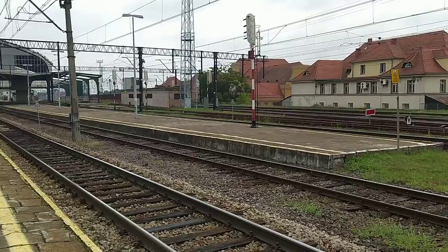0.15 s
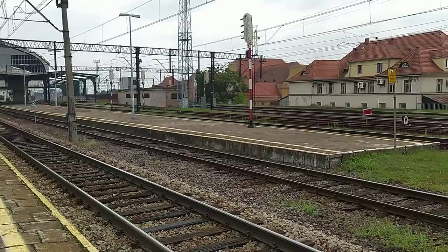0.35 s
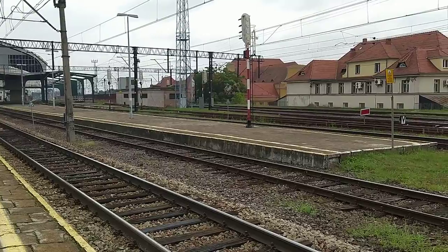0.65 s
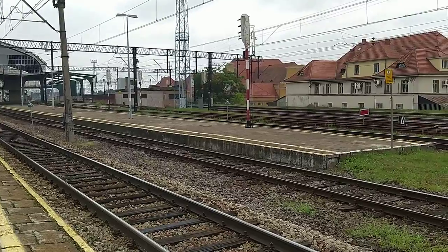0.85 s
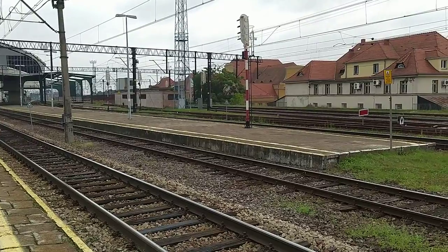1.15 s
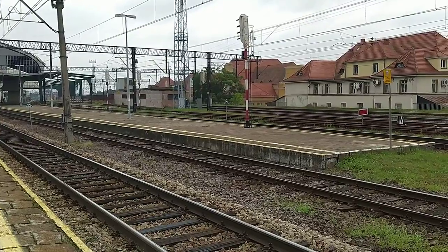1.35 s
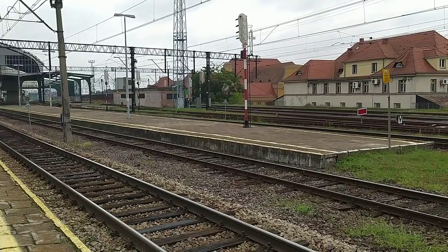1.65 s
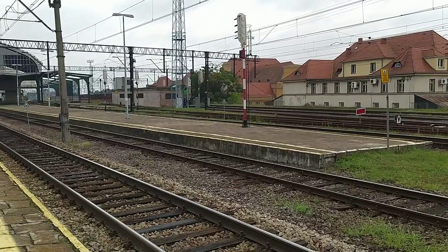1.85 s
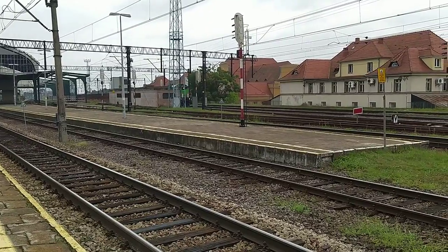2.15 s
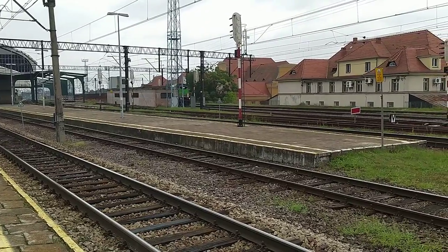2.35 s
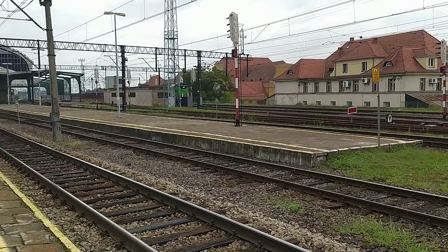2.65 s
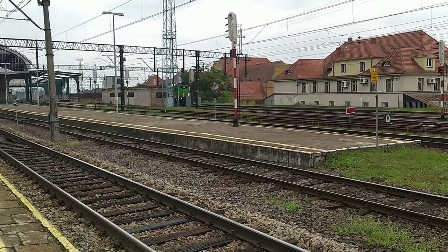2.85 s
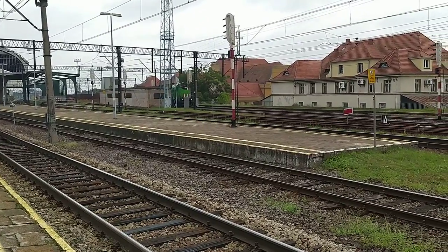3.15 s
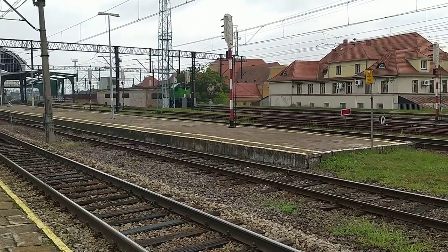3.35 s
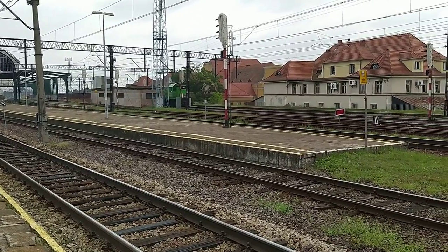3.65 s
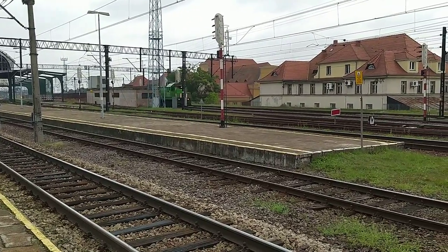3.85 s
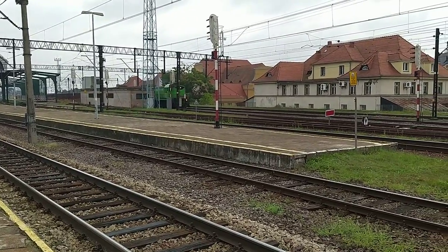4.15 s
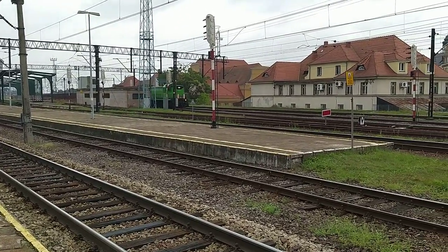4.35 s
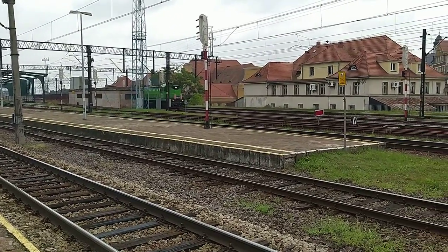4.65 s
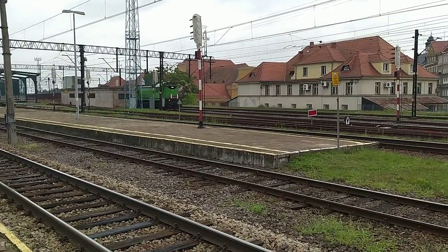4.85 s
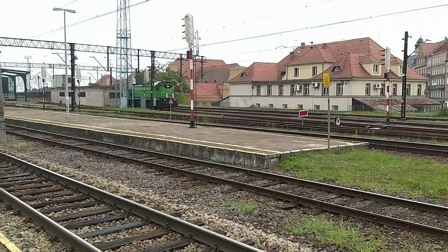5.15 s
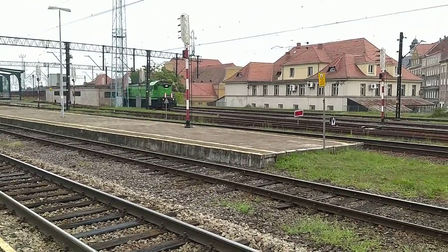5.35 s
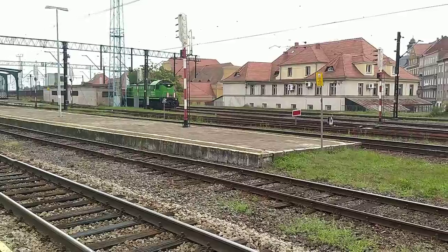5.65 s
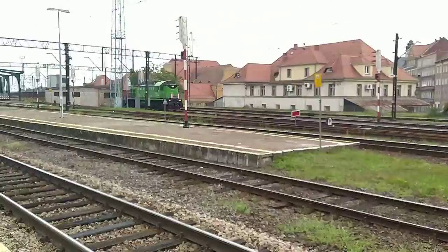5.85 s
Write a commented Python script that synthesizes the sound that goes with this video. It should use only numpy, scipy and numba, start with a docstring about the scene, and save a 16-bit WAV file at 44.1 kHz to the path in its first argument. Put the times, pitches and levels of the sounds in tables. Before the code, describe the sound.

An open station yard with low town rumble, heard on a handheld stereo phone. From 0 s a diesel locomotive about a hundred metres off throbs unevenly, roughly four pulses a second, under broad roar and a low gear hum that comes and goes. Three faint coupling clanks fall within the first half second. Soft air jets hiss from about 0.4, 1.1 and 3.1 s, each fading within about a second. A brief wind buffet hits the right near 1.6 s. The turbo whine, around 1700 Hz and slipping slightly lower, is weak at first, clears by 2 s, and is strong and fluttering from 3 s, shifting between sides with echoes. The throb opens up near 3.5 to 4 s. Close left case ticks, rubs and thumps begin at 3.9 s, cluster at 4.2 to 4.4, and return sharply near 5.2, faintly near 5.9. Roar and hissing air keep growing to the end at 6 s.

```python
"""A slow diesel locomotive draws freight wagons towards a platform, a hundred metres off.
From the start, exhaust tones throb under a broad noise roar and a gear drone; far couplings clank.
The turbocharger whines, echoes off the buildings and swells; air valves hiss, drain jets blow, wind puffs.
Near 4 s, then above 5 s, fingers make the phone's case tick and creak beside the left microphone:
each tick is a filtered noise click with a falling thump."""
import sys
import numpy as np
from scipy import signal
from scipy.io import wavfile
from scipy.ndimage import uniform_filter1d
from numba import njit

SR = 44100
rng = np.random.default_rng(int(sys.argv[2]) if len(sys.argv) > 2 else 0)


def int16_out(signal):
    """Quantize to a 16-bit WAV file."""
    q = np.round(np.clip(np.atleast_2d(signal).T, -1, 1) * 32767)
    wavfile.write(sys.argv[1], SR, q.astype(np.int16))


N = 264897

CYCLE_HZ = 3.897  # one four-stroke cycle, two crank turns
HALF_WAY_S = 3  # half-way through the approach
PORT_LAG, LAG_TOP_HZ = 20, 200  # samples by which the left port hears low noise bands later; their top


def undb(db):
    """Turn decibels into a plain gain."""
    return 10 ** (np.asarray(db) / 20)


def curves(table):
    """Columns joined by straight lines in time."""
    s, *columns = np.transpose(table)
    return [np.interp(np.arange(N) / SR, s, c) for c in columns]


def at_hz(table, hz):
    """Read a table at a frequency, with straight lines over log frequency."""
    table = np.array(table)
    return np.interp(np.log(hz), np.log(table[:, 0]), table[:, 1])


def unit(x):
    """Scale to an rms of 1."""
    return x / np.sqrt(np.mean(x ** 2))


@njit
def svf(x, hz, width):
    """State-variable band-pass with a moving centre, gain 1 there."""
    y, band, low = np.empty(len(x)), 0., 0.
    for i in range(len(x)):
        g, k = np.pi * hz[i] / SR, width / hz[i]
        g *= 1 + g * g / 3 + 2 * g ** 4 / 15  # close to the tangent
        v = (band + g * (x[i] - low)) / (1 + g * (g + k))
        band, low, y[i] = 2 * v - band, low + 2 * g * v, k * v
    return y


def walk(rate):
    """Random levels held 1 / rate s and slewed twice; spread near 1."""
    k = int(SR / rate)
    steps = np.repeat(rng.standard_normal(N // k + 1), k)
    return 1.3 * uniform_filter1d(uniform_filter1d(steps, k), k)[:N]


def ports(hz, width):
    """One band of noise at both ports, more alike in the bass, where the left hears it later."""
    # how much left and right share: (frequency [Hz], likeness [0 to 1])
    likeness = [(60, .93), (300, .8), (700, .72), (1400, .7), (2500, .6), (4500, .2), (7000, 0)]
    # balance of the ports: (frequency [Hz], left minus right [dB])
    balance = [(60, 3.5), (700, 4), (1300, 7), (2400, 0), (4400, -3), (9000, -1)]
    mid, side = (svf(svf(rng.standard_normal(N), hz, width), hz, width) for _ in range(2))
    c = np.clip(at_hz(likeness, hz[0]), 0, 1)
    lean = at_hz(balance, hz[0]) / 2
    mid, side = mid * np.sqrt(1 + c), side * np.sqrt(1 - c)
    left = np.roll(mid + side, PORT_LAG * (hz[0] < LAG_TOP_HZ))
    return np.array([left * undb(lean), (mid - side) * undb(-lean)])


def wash(colour, flicker_db):
    """Quarter-octave noise bands of a given colour, each flickering alone."""
    lowest, highest = colour[0][0], colour[-1][0]
    out = 0
    for hz in lowest * 2 ** np.arange(0, np.log2(highest / lowest), 1 / 4):
        level = undb(at_hz(colour, hz) + flicker_db * walk(6))
        out = out + level * ports(np.full(N, hz), hz / 4)
    return unit(out)


def tone(hz, waver=0):
    """Sine of rms 1 with a moving pitch; waver shifts its phase (rad)."""
    return np.sqrt(2) * np.sin(2 * np.pi * np.cumsum(hz) / SR + waver)


def firing(depth):
    """Swell at the firing rate of one bank of six cylinders."""
    return 1 + depth * np.cos(2 * np.pi * 6 * CYCLE_HZ * np.arange(N) / SR)


def growing(db, db_per_s, until_s=np.inf):
    """Level that climbs steadily as the train nears."""
    return db + db_per_s * (np.minimum(np.arange(N) / SR, until_s) - HALF_WAY_S)


def low_at_ports(x):
    """A low sound reaches the left port a little later and stronger than the right."""
    return np.array([np.roll(x, PORT_LAG) * undb(2.5), x * undb(-2.0)])


def town():
    """Low town rumble: steady noise bands that flicker slightly."""
    # colour of the rumble: (frequency [Hz], relative level [dB per Hz])
    rumble = [(18, 0), (35, 1), (70, -2), (105, -9)]
    return undb(-47.5) * wash(rumble, 0.64)


def exhaust():
    """Uneven firings repeat each cycle: multiples of the cycle rate beat into a throb."""
    # tones, levels before port balance: (multiple of the cycle [1], half-way level [dB],
    # growth [dB per s], step as the stack clears the roof [dB])
    orders = [(6, -45, 1.7, 0), (7, -59, 0, 0), (10, -65, 1, 7), (11, -52, 1, 6), (12, -52, 1.2, 2),
              (13, -46, 1.2, -6), (14, -56, 0, 3), (15, -46.5, .3, 6), (16, -52, 0, 9),
              (18, -48.5, 2.5, -7), (19, -52, 2.2, 0), (20, -58, .7, 0), (22, -61, .3, 2), (23, -62, 3, -3),
              (25, -64, 2.6, 0), (48, -61, 0, 0)]
    full_s = 4.2  # growth stops here
    clears_s, clears_within_s = 3.4, .7
    throb_s, throb_turn_rad = .123, -2.6  # loudest moment of the cycle; pulses pull the pressure down
    throb_spread = -.52  # upward smear (rad per order squared)
    lump_depth, lump_s = .4, .16  # in the open one stretch of each cycle stands out; its middle
    out, t = np.zeros(N), np.arange(N) / SR
    clear = np.clip((t - clears_s) / clears_within_s, 0, 1)
    for k, db, growth_db, step_db in orders:
        turn = 2 * np.pi * k * CYCLE_HZ * (t - throb_s)
        turn += throb_spread * (k - 15.5) ** 2 + throb_turn_rad + .25 * walk(1)
        level = undb(growing(db, growth_db, full_s) + step_db * clear + walk(0.75))
        out += level * np.sqrt(2) * np.cos(turn)
    out *= 1 + lump_depth * clear * np.cos(2 * np.pi * CYCLE_HZ * (t - lump_s))
    return low_at_ports(out)


def gear_drone():
    """Gears hum on a slowly rising tone with a weaker lower octave, swelling now and then."""
    # swells before flicker and port balance: (time [s], level [dB])
    swells = [(0, -54), (.5, -54), (.75, -66), (1.1, -58), (1.85, -53), (2.1, -58), (2.45, -49), (2.7, -61),
              (2.95, -52.5), (3.35, -54), (3.6, -47.5), (3.9, -60), (4.25, -50), (4.4, -54), (4.7, -47.5),
              (4.87, -51), (5.3, -43.5), (5.55, -47), (5.75, -54), (6, -45)]
    hz = 235.7 + .6 * np.arange(N) / SR
    db, = curves(swells)
    hum = tone(hz, .2 * walk(3)) + undb(-14) * tone(hz / 2, .3 * walk(3))
    return low_at_ports(undb(db + walk(8)) * hum)


def whine():
    """A turbocharger blade tone shaken by the firings, with scattered sound and a lowered echo."""
    # turbocharger running down: (time [s], blade tone [Hz])
    run_down = [(0, 1724), (.5, 1720), (1.5, 1709), (2, 1702), (2.5, 1695.5), (3.2, 1691.5), (4, 1684),
                (5, 1678), (6, 1672.5)]
    # whine clearing the station roof, then fading in and out as paths interfere, before flicker:
    # (time [s], left level [dB], right level [dB], left phase lead before its wander [rad])
    fades = [(0, -60, -61, -.2), (.15, -56, -56, -.2), (.33, -61, -60, -.2), (.47, -56, -54, -.2),
             (.62, -50.5, -55, -.2), (.76, -49.5, -58, -.2), (.88, -57, -51.5, -.2), (1.12, -63, -53, -.2),
             (1.22, -64, -56, -.2), (1.31, -51, -55, -.2), (1.48, -56, -50, -.3), (1.6, -46.5, -44.5, -.3),
             (1.8, -49, -40.5, 0), (1.99, -45, -38, -.9), (2.1, -38, -38, -.3), (2.27, -41.5, -35, -.3),
             (2.44, -37, -32.5, -.5), (2.54, -37.5, -31.5, -.7), (2.7, -38, -34.5, -.6),
             (2.79, -36.5, -32.5, -.3), (2.9, -45.5, -36, .1), (3, -43, -36, -.3), (3.1, -33, -31, -1.2),
             (3.24, -33, -31.5, -1.1), (3.34, -42.5, -32.5, -1), (3.43, -41, -34, -1.2),
             (3.51, -55.5, -38.5, 0), (3.63, -40, -35.5, -1), (3.85, -32, -37, -.5),
             (3.95, -42.5, -39.5, -2.2), (4.07, -42, -45.5, -1.6), (4.14, -51, -40, -.7),
             (4.2, -42.5, -41.5, -1.7), (4.27, -42.5, -47.5, .1), (4.39, -33.5, -34.5, 1.7),
             (4.48, -35, -41.5, -.3), (4.53, -37.5, -36, -1.4), (4.58, -46, -33.5, -1),
             (4.65, -36.5, -34, .1), (4.72, -33.5, -39, -.4), (4.77, -33.5, -35, -.7),
             (4.83, -31, -40, -1.8), (4.88, -34, -34, -2.4), (4.93, -41, -33, -.7), (4.98, -37, -35, -1.5),
             (5.13, -37, -30, -3), (5.21, -43.5, -32.5, -3.4), (5.27, -37.5, -36.5, -3.1),
             (5.31, -37, -39, -2.9), (5.36, -36.5, -39, -.5), (5.43, -39.5, -35, -.3), (5.53, -29, -31, -1),
             (5.62, -37, -33.5, -1.3), (5.74, -33, -30, -1.1), (5.79, -35.5, -31.5, -1),
             (5.85, -32, -28, -1.2), (5.91, -41, -31.5, -.6), (6, -42, -33.5, -.5)]
    # overtones against the smoothed whine, before flicker: (multiple [1], level [dB])
    overtones = [(3, -51)]
    # octave, pulsing with the firings, before flicker: (time [s], left level [dB], right level [dB])
    octave_levels = [(1.7, -85, -78), (2.1, -78, -68), (2.3, -71, -63), (2.5, -71, -63), (2.62, -80, -70),
                     (3.2, -80, -73), (4.4, -76, -76), (4.6, -71, -69), (5.1, -71, -71), (5.45, -78, -79),
                     (5.6, -63, -70), (5.75, -62, -66), (5.92, -63, -64.5), (6, -69, -68)]
    # whine returned by the buildings behind the engine, before flicker: (time [s], level [dB])
    returns = [(0, -62), (.14, -56), (.28, -55.5), (.36, -63), (.52, -53), (.66, -61), (.9, -62),
               (1.04, -53), (1.15, -61), (1.4, -62), (1.52, -54), (1.7, -59), (2, -57), (6, -61)]
    echo_shift_hz = -35
    scatter_db, scatter_db_per_s = -25, .8  # many weak paths, against the whine
    scatter_floor_db = -61  # their steady share
    scatter_shift_hz, scatter_width_hz = -6.5, 23.0
    t = np.arange(N) / SR
    hz, = curves(run_down)
    left_db, right_db, lead = curves(fades)
    lead = lead + .06 * t / t[-1] * walk(4.57)  # the phase wanders more and more
    echo_db, = curves(returns)
    near = undb(uniform_filter1d((left_db + right_db) / 2, SR // 2))
    shake = .1 * walk(40)  # rad, the same at both ports
    out = []
    for db, turn, octave_db in zip((left_db, right_db), (lead, 0), curves(octave_levels)):
        blade_level = undb(db + .7 * walk(30) + .4 * walk(8)) * firing(.1)
        blade = blade_level * tone(hz, turn + shake + .06 * walk(30))
        over = sum(undb(d + 4 * walk(13)) * tone(k * hz, .5 * walk(10)) for k, d in overtones)
        octave = undb(octave_db + 2 * walk(20)) * firing(.35) * tone(2 * hz, .4 * walk(10))
        echo_level = undb(echo_db + 3 * walk(15) + 1.5 * walk(4))
        echo = echo_level * tone(hz + echo_shift_hz, .4 * walk(12))
        out.append(blade + near * over + octave + echo)
    paths = near * undb(growing(scatter_db, scatter_db_per_s)) + undb(scatter_floor_db)
    paths = paths * unit(ports(hz + scatter_shift_hz, scatter_width_hz))
    skirt = near * undb(-13.0) * unit(ports(hz + 25, 128.0))  # wider band of noise
    return np.array(out) + paths + skirt


def train_noise():
    """Roar, casing and block rung by the firings, valve and wheel clatter, leaking air."""
    # colours of roar, clatter and leaking air: (frequency [Hz], relative level [dB per Hz])
    roar_colour = [(100, -11.5), (134, -19.5), (185, -7.5), (205, -9.5), (235, -13), (270, -18.5),
                   (500, -18), (759, -22.5), (1200, -28), (1440, -26.5), (1910, -31), (3000, -38)]
    clatter_colour = [(2600, 5), (3200, 1.5), (4500, 4.5), (6500, 0), (8000, -1.5)]
    air_colour = [(6200, -20), (7500, 0), (8800, 8.5), (10000, 1), (11000, 2)]
    # engine casing ring, before flicker: (time [s], frequency [Hz], level [dB])
    casing_ring = [(0, 2150, -54.5), (1.2, 2126, -58), (1.97, 2190, -54), (2.39, 2198, -50.5),
                   (3.9, 2193, -52), (4.68, 2075, -51), (5.38, 2054, -49), (6, 2034, -49)]
    # half-way levels (dB) and growth (dB per s)
    roar_db, block_db, nearing_db_per_s = -43, -53, 1.18
    leak_db, leak_db_per_s = -63.5, 1.6
    clatter_db = -6.5  # against the casing ring
    opens_s, open_db = 4.6, 3.5  # the valve opens wider within half a second
    ring_hz, ring_db = curves(casing_ring)
    roar = undb(growing(roar_db, nearing_db_per_s)) * wash(roar_colour, 0.57)

    casing = unit(ports(ring_hz, 295.0)) + undb(-11.0) * unit(ports(1.166 * ring_hz, 190.0))
    casing = undb(ring_db + 1.67 * walk(25.04)) * casing
    block = unit(ports(np.full(N, 960.), 232.0))
    block = undb(growing(block_db, nearing_db_per_s) + 1.67 * walk(25)) * block
    rings = firing(0.17) * (casing + block)

    clatter = undb(ring_db + clatter_db) * firing(0.1) * wash(clatter_colour, 1.0)
    valve_db = growing(leak_db, leak_db_per_s)
    valve_db += open_db * np.clip(2 * (np.arange(N) / SR - opens_s), 0, 1)
    air = undb(valve_db) * wash(air_colour, 1.0)
    gusts = undb(1.16 * walk(9))  # clatter and air flicker together
    return roar + rings + gusts * (clatter + air)


def clanks():
    """Far couplings clank: steel blows smeared by the yard into short noisy rings."""
    # blows: (time [s], level [dB])
    hits = [(0.058, -40), (.26, -49), (.435, -42)]
    # ringing bands: (frequency [Hz], relative level [dB], time to fall 60 dB [s])
    modes = [(1080, 3, 0.06), (1580, -3.5, 0.43), (2105, -3, 0.39), (2520, -6, 0.08)]
    out, t = 0, np.arange(N) / SR
    for hz, db, t60 in modes:
        shape = 0
        for s, hit_db in hits:
            fall_db = 60 * np.clip(t - s, 0, 1) / t60
            shape = shape + undb(hit_db + db - fall_db) * np.clip((t - s) / 0.011, 0, 1)
        out = out + shape * unit(ports(np.full(N, 1. * hz), 380.0))
    return out


def blows():
    """A drain valve blows off: noise jets open fast, sag, and start to shut after about half a second."""
    # jets: (opening time [s], level [dB], fade [dB per s])
    jets = [(.4, -63.5, 7), (1.1, -55.5, 11), (3.12, -53.5, 13.5)]
    # colour of the jets: (frequency [Hz], relative level [dB per Hz])
    jet_colour = [(3500, -15), (4300, 2), (6500, 0.5), (8000, 0), (9900, 3.5), (11000, 0)]
    t, shape = np.arange(N) / SR, 0
    for s, db, fade_db in jets:
        opening = np.clip((t - s) / 0.1, 0, 1)
        shutting = np.clip((s + 1.13 - t) / 0.55, 0, 1)
        shape = shape + undb(db - fade_db * (t - s)) * opening * shutting
    return shape * wash(jet_colour, 0.43)


def wind():
    """Brief low buffets of band noise, mostly on the right port."""
    # puffs: (time [s], right level [dB], length to either side [s])
    puffs = [(1.578, -35.5, .011), (1.606, -39, .004), (1.638, -35.5, .012)]
    t, hz = np.arange(N) / SR, np.full(N, 280.)
    shape = sum(undb(db) * np.exp(-((t - s) / w) ** 2) for s, db, w in puffs)
    noise = unit(svf(svf(rng.standard_normal(N), hz, 250.0), hz, 250.0))
    return np.array([[.2], [1]]) * shape * noise


def at_case(x):
    """Sounds of the case are beside the left microphone and faint at the right."""
    return np.array([x, 0.013 * x])


def rub():
    """Skin slides on the case: fast-flickering high noise."""
    # sliding, before flicker: (time [s], level [dB])
    slides = [(3.85, -91), (3.91, -60), (3.94, -80), (4.12, -78), (4.16, -66), (4.3, -62), (4.36, -63),
              (4.41, -67), (4.45, -91)]
    rub_db, = curves(slides)
    noise = unit(svf(rng.standard_normal(N), np.full(N, 10000.), 9000.))
    return at_case(undb(rub_db + 4.0 * walk(210)) * noise)


def ticks():
    """Each slip is a click inside a short fizz, a crack and a bending wave in the case, its lows late."""
    # slips: (time [s], click level [dB], thump level [dB], fizz level [dB],
    # pitch the thump falls to [Hz])
    slips = [(3.912, -26, -61, -42, 300), (3.922, -31, -36, -39, 296), (4.168, -31, -50, -42, 300),
             (4.1827, -31, -18, -39, 293), (4.2347, -25, -14.5, -52, 670), (4.2378, -22, -16, -33, 524),
             (4.2491, -22, -16.5, -34, 310), (4.28, -40, -29, -51, 500), (4.296, -36, -30, -48, 300),
             (4.334, -35, -27, -43, 200), (4.3412, -30, -45, -33, 300), (4.3439, -23, -12, -34, 310),
             (4.382, -33, -25, -42, 297), (4.3858, -8.5, -5.5, -33, 284), (4.395, -30, -42, -32, 306),
             (4.4023, -24, -22, -47, 202), (5.186, -10, -24, -44, 404), (5.253, -25, -22.5, -40, 220),
             (5.881, -32, -45, -62, 302), (5.915, -42, -47, -61, 300)]
    click_hz, click_scatter, click_ring_s = 8520, 0.044, .00017  # ring is a half length
    sweep_hz, sweep_s = 2970, .0008  # how far and fast the thump falls
    fizz_s, lead = 0.0036, 300  # fizz decay; samples by which it starts early
    out, t = np.zeros(N), np.arange(1400) / SR
    sweep = sweep_hz * np.exp(-t / sweep_s)
    swell = .45 * (1 - np.exp(-t / .0003)) + .6 * np.exp(-(t / .0031 - 1) ** 2 / .08)
    swell = swell * np.exp(-(t / .0055) ** 4)
    # the whole case rocks a little after the wave has passed
    rock = 0.13 * np.sin(2 * np.pi * 140 * t) * (t / 0.019) * np.exp(1 - t / 0.011)
    late = t - lead / SR
    fizz_shape = np.exp(-np.abs(late) / np.where(late < 0, 0.42 * fizz_s, fizz_s))
    grain = rng.standard_normal((len(slips), 2, len(t)))
    for (s, click_db, thump_db, fizz_db, low_hz), (g, h) in zip(slips, grain):
        centre = np.full(len(t), click_hz * (1 + click_scatter * h[0]))
        i = int(s * SR)

        wave = np.sin(2 * np.pi * np.cumsum(low_hz + sweep) / SR)
        thump = swell * (wave + 0.3 * (wave ** 2 - .5)) + rock  # crests sharper than troughs
        thump = thump * (1 + 0.38 * svf(h, 0 * t + 2200.0, 1160.0))  # roughened

        burst = g + 0.95 * np.sin(2 * np.pi * centre * t)
        burst = burst * np.exp(-(t / click_ring_s - 1) ** 2)
        click = svf(svf(burst, centre, 4400.0), centre, 4400.0)
        click = click + 0.64 * svf(burst, 0 * t + 11100.0, 4000.0)
        body = svf(g * np.exp(-t / .001), 0 * t + 2600.0, 3000.0)
        crack = svf(h * np.exp(-t / 0.0011), 0 * t + 2200.0, 1300.0)

        out[i:i + len(t)] += undb(click_db) * click / np.abs(click).max() + undb(thump_db) * thump
        out[i:i + len(t)] += undb(thump_db - 12) * crack / np.abs(crack).max()
        out[i:i + len(t)] += undb(click_db - 13) * body / np.abs(body).max()
        fizz = unit(svf(h, 1.09 * centre, 5300.0)) * fizz_shape
        out[i - lead:i - lead + len(t)] += undb(fizz_db) * fizz
    return at_case(out)


def scene():
    """The train far off over town rumble, hands and wind close by."""
    # distance takes the highest treble
    air = signal.butter(6, 11000, fs=SR, output="sos")
    far = signal.sosfilt(air, train_noise() + blows())
    train = exhaust() + gear_drone() + whine() + far + clanks()
    return town() + train + wind() + rub() + ticks()


def record(dry):
    """The phone cuts the top: a steep low-pass at 15.8 kHz."""
    return signal.sosfilt(signal.ellip(8, .2, 80, 15800, fs=SR, output="sos"), dry)


dry = scene()
out = record(dry)
int16_out(out)
```